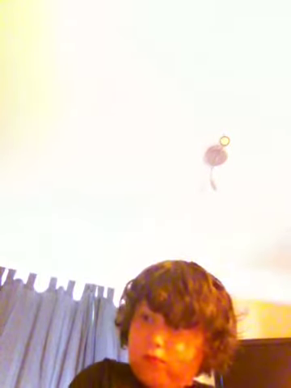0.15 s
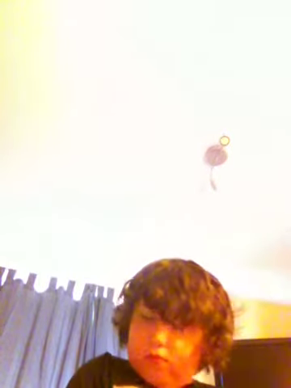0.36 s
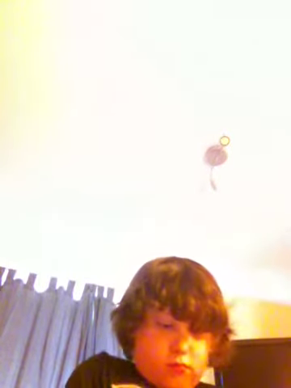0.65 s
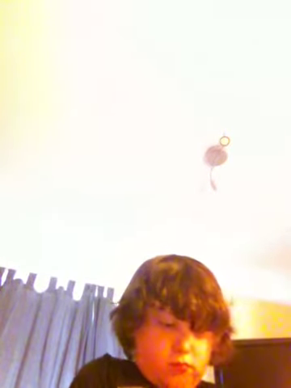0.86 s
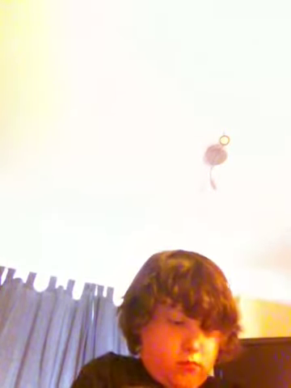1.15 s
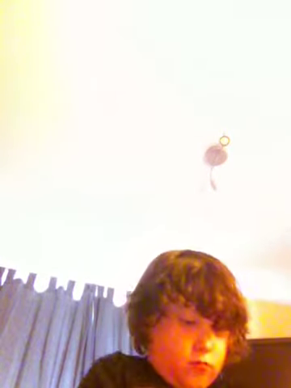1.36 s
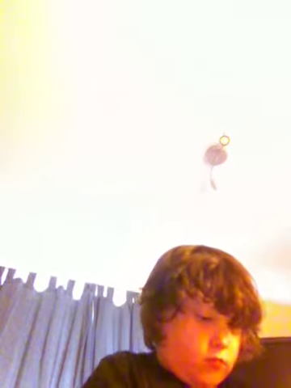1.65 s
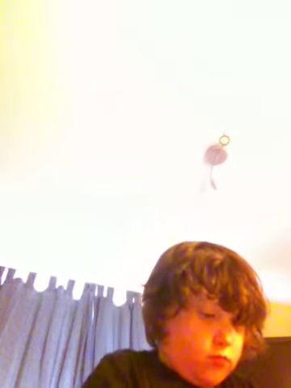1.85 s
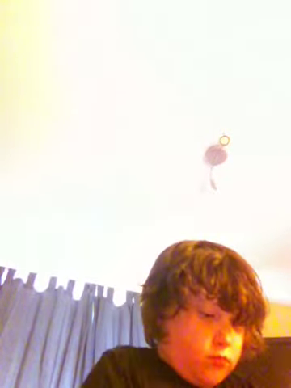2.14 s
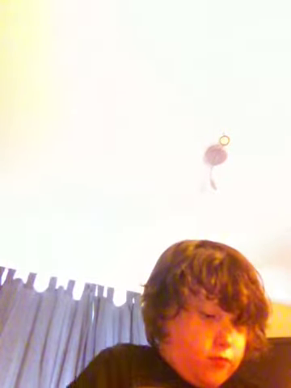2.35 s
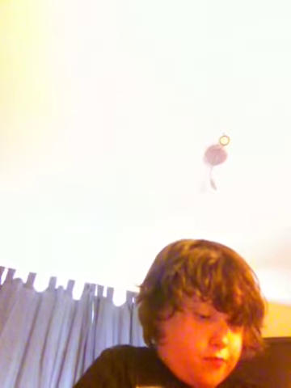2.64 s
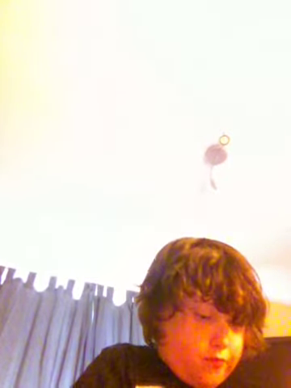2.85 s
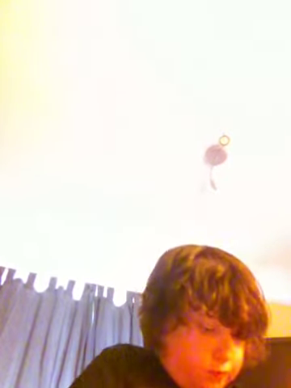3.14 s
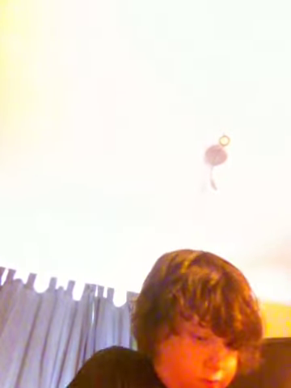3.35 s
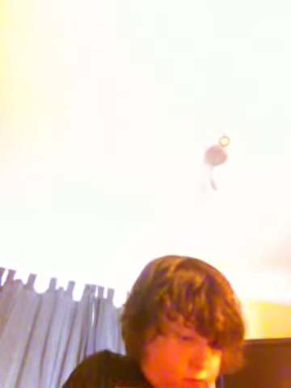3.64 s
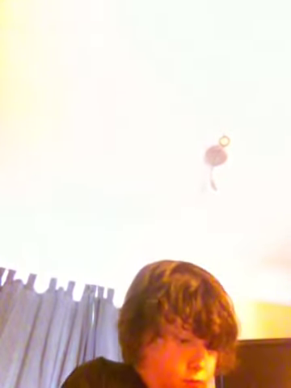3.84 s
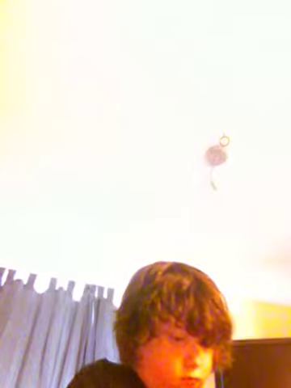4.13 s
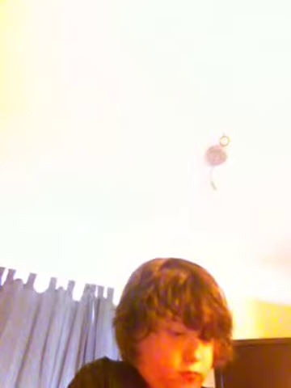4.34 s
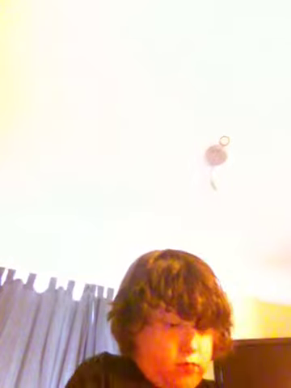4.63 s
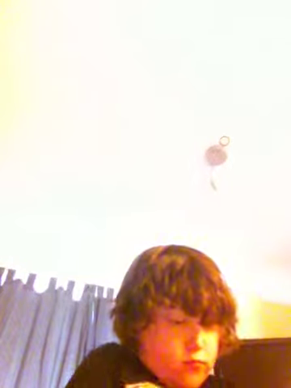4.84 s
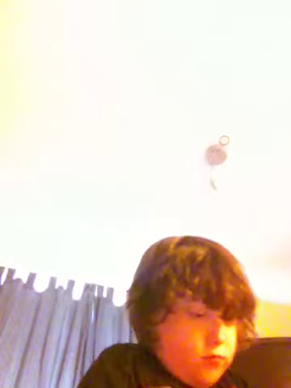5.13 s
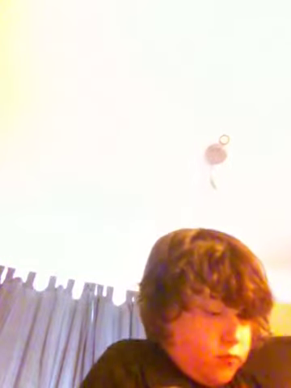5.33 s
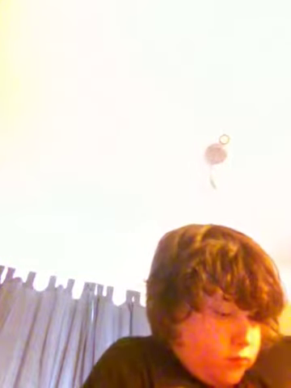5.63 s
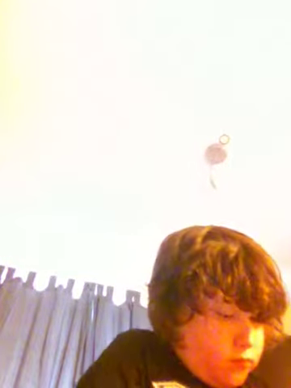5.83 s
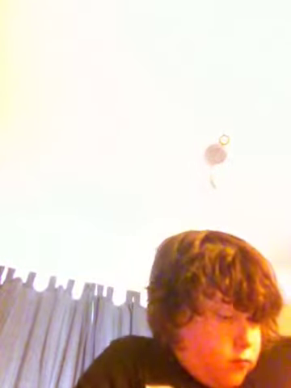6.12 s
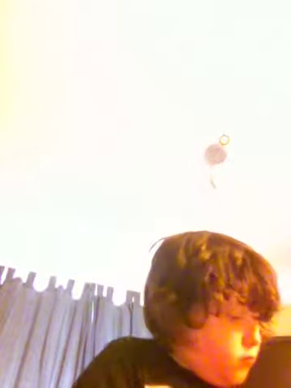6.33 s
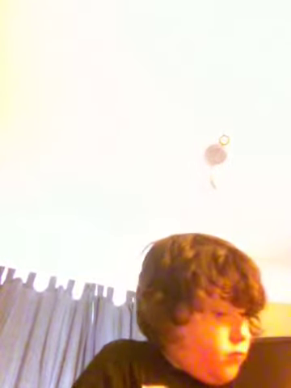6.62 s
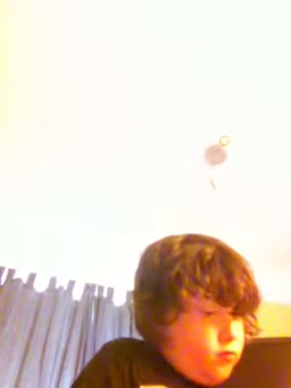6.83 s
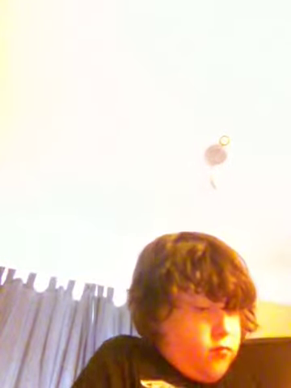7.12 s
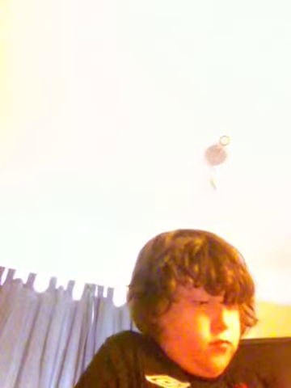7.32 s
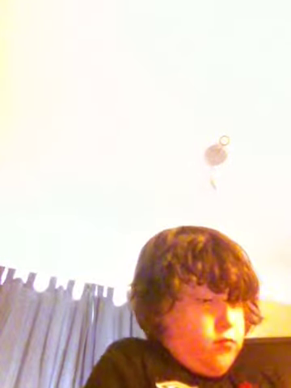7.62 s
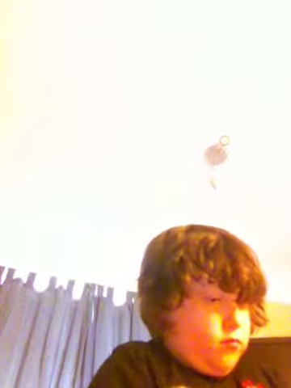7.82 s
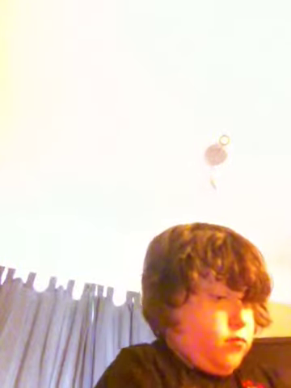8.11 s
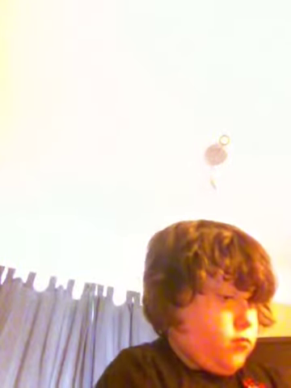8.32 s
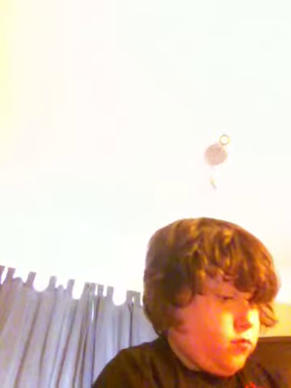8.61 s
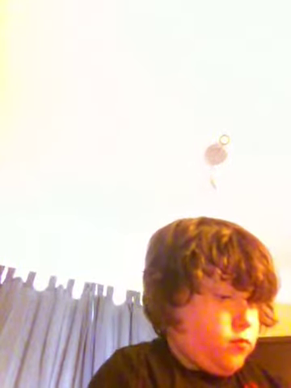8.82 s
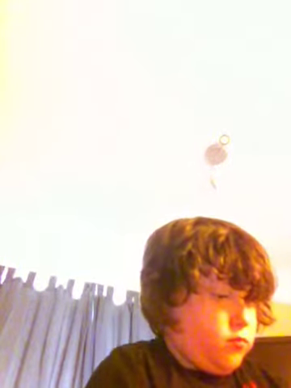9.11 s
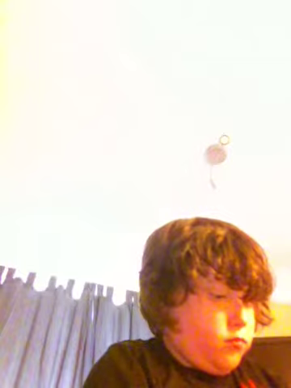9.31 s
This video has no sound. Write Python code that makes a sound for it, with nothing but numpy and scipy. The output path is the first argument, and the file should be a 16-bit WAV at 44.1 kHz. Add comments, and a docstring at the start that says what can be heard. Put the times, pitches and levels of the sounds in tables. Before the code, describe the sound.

Short, raspy rips of adhesive tape pulled off its roll in a quiet small room, with soft rubbing, stick bumps and faint fan hum.

```python
"""A small room: adhesive tape is pulled off its roll in short rips and wound round a stick shaft.
The glue lets go in fast uneven slips that ring the taut strip.
Between pulls the hands rub the tape down and the stick bumps a few times: shudder plus shaft modes.
A fan hums as steady-pitched tones under the shaped noise of air and a small microphone."""
import sys
import numpy as np
from scipy import signal
from scipy.fft import rfft, irfft, next_fast_len
from scipy.io import wavfile
from scipy.ndimage import map_coordinates

SR = 44100
rng = np.random.default_rng(int(sys.argv[2]) if len(sys.argv) > 2 else 0)


def materialize(psi):
    """Save the field psi as 16-bit PCM at rate SR to the path in sys.argv[1].

    A 1-D psi becomes a single channel; in a 2-D psi each row is a channel.
    """
    bounded = np.clip(np.atleast_2d(psi).T, -1, 1)
    quanta = np.round(bounded * 32767).astype(np.int16)
    wavfile.write(sys.argv[1], SR, quanta)


N = 417186
SIZE = 16384  # samples in a click, blow or room tail
HZ = np.fft.rfftfreq(SIZE, 1 / SR)
TIME = np.arange(N) / SR


def amp(db):
    """Amplitude ratio of a level in dB."""
    return 10 ** (np.asarray(db) / 20)


def unit(x):
    """x at rms 1."""
    return x / np.sqrt(np.mean(x ** 2) + 1e-20)


def along(points, hz):
    """Interpolate (frequency [Hz], value) points on a log-frequency axis."""
    point_hz, values = np.transpose(points)
    return np.interp(np.log(hz + 1), np.log(point_hz + 1), values)


def add(track, start_s, sound):
    """Mix a sound into the track from start_s."""
    part = track[max(round(start_s * SR), 0):][:len(sound)]
    part += sound[:len(part)]


def wobble(knots_per_s):
    """Smooth random curve over the whole scene."""
    knots = rng.standard_normal(int(N * knots_per_s / SR) + 4)
    return map_coordinates(knots, [TIME * knots_per_s])


def coloured(x, spectrum):
    """x filtered by (frequency [Hz], level [dB]) points, at rms 1."""
    size = next_fast_len(N + SIZE)
    gain = amp(along(spectrum, np.fft.rfftfreq(size, 1 / SR)))
    return unit(irfft(rfft(x, size) * gain, size)[:N])


def impulse(gain):
    """Causal minimum-phase click of energy 1 with this spectral shape on HZ."""
    cepstrum = irfft(np.log(np.maximum(gain, 1e-6)))
    click = irfft(np.exp(rfft(2 * cepstrum[:SIZE // 2], SIZE)))
    return click / np.linalg.norm(click)


def bent(x, delay_s):
    """Bending waves carry treble faster than bass: delay is delay_s * sqrt(1000 / Hz), less its Nyquist value."""
    phase = 4 * np.pi * delay_s * np.sqrt(1000 * HZ)
    phase = phase - phase[-1] * HZ / SR
    return irfft(rfft(x, SIZE) * np.exp(-1j * phase), SIZE)[:SIZE * 3 // 4]


# room decay: (frequency [Hz], t60 [s])
ROOM_DECAY = [(150, 0.29), (400, 0.23), (1000, 0.2), (2800, 0.19), (7000, 0.2), (15000, 0.22)]


def in_room(x, wet_db, gap_s=0.0033):
    """Direct sound plus a fresh diffuse tail, each frequency dying at its own speed."""
    hz, t, noise = signal.stft(rng.standard_normal(SIZE), SR, nperseg=256)
    decay = amp(-60 * t / along(ROOM_DECAY, hz)[:, None])
    tail = signal.istft(noise * decay, SR, nperseg=256)[1]
    tail[:round(gap_s * SR)] = 0
    response = amp(wet_db) * tail / np.linalg.norm(tail)
    response[0] = 1  # direct sound
    return signal.fftconvolve(x, response / np.linalg.norm(response))


# fan tones: (frequency [Hz], level [dB rms])
FAN_TONES = [(91.5, -89.5), (113.0, -80), (161.5, -81), (253.0, -80.5), (279.9, -80), (301.5, -78.5),
             (344.5, -79.5), (414.5, -84), (441.4, -84)]


def fan(drift_rad=0.24):
    """Rotation gives a set of tones, each with a slow random phase drift."""
    hum = np.zeros(N)
    for hz, db in FAN_TONES:
        phase = 2 * np.pi * (hz * TIME + rng.random()) + drift_rad * wobble(2.56)
        hum += amp(db) * np.sqrt(2) * np.sin(phase)
    return hum


# air and microphone noise: (frequency [Hz], relative density [dB per Hz])
FLOOR_SPECTRUM = [(15, -69), (25, -23), (64, -18.5), (104, -3), (164, -6), (183, -17), (198, -1.5),
                  (322, -9), (349, -3), (389, -8), (421, -13), (537, -11), (648, -12), (1020, -15),
                  (15500, -25)]


def hiss(level_db=-67.5):
    """Air noise and microphone hiss: steady noise, strongest in the lows."""
    return amp(level_db) * coloured(rng.standard_normal(N), FLOOR_SPECTRUM)


# strokes pressing and turning the tape, relative levels:
# (middle time [s], half length to 1/e [s], rub level [dB], dull push level [dB])
RUB_STROKES = [(1.098, 0.012, -73, -55), (1.856, 0.21, -75.5, -71), (2.813, 0.081, -64, -60.5),
               (4.89, 0.037, -68, -66), (5.98, 0.017, -68, -68), (6.557, 0.019, -64.5, -59),
               (6.687, 0.029, -66, -63), (8.346, 0.029, -78, -65)]
# sticky side letting go under a finger: (time [s], relative level [dB])
STICKY_TICKS = [(3.948, -57), (4.857, -52), (5.836, -56)]
# rub on the tape: (frequency [Hz], relative density [dB per Hz])
RUB_SPECTRUM = [(200, -7), (600, 4), (1700, -1.5), (2100, -1), (2450, 0.5), (2800, -5), (5500, -11.5),
                (9000, -32), (16000, -32)]
# push on the shaft: (frequency [Hz], relative density [dB per Hz])
PUSH_SPECTRUM = [(50, -51), (120, -0.5), (220, 4.5), (400, -9), (900, -22), (3000, -72)]


def hands(tick_t60_s=0.043):
    """Fingers smooth the tape: grainy rub noise and sticky ticks over a dull push on the shaft."""
    rub, push = np.zeros(N), np.zeros(N)
    for middle_s, half_s, rub_db, push_db in RUB_STROKES:
        stroke = np.exp(-((TIME - middle_s) / half_s) ** 2)
        rub += amp(rub_db) * stroke
        push += amp(push_db) * stroke
    for start_s, db in STICKY_TICKS:
        add(rub, start_s, amp(db - 60 * TIME[:SIZE] / tick_t60_s))
    grains = rng.standard_normal(N) * amp(2.9 * wobble(500))
    touch = rub * coloured(grains, RUB_SPECTRUM)
    touch += push * coloured(rng.standard_normal(N), PUSH_SPECTRUM)
    return amp(-2) * in_room(touch, wet_db=-3.5)[:N]


# stick bumps: (time [s], relative level [dB], contact low-pass cutoff [Hz], bass boost [dB])
STICK_BUMPS = [(1.954, -47, 470, 10), (3.183, -46.5, 704, -20), (3.195, -52, 654, -14),
               (5.2228, -36, 497, 4.5), (8.667, -29.5, 1540, 0.5)]
# shaft modes: (frequency [Hz], relative level [dB], t60 [s])
SHAFT_MODES = [(109.2, -12.5, 0.15), (138.6, -11, 0.25), (201, -1, 0.13), (260.4, 2.5, 0.09),
               (373, -10, 0.2), (440, -2.5, 0.13), (517, -6.5, 0.14), (595.5, -5, 0.074), (725, 2.5, 0.056),
               (853, -11, 0.13), (913, -18, 0.2), (1110, -30, .1), (1360, -18, 0.082), (1540, -6, 0.058),
               (1720, -6, 0.11), (2145, -18, 0.1), (2350, -12, 0.084), (3750, -15, 0.065)]
# shudder of the bump: (frequency [Hz], relative density [dB per Hz])
THUD_SPECTRUM = [(5, -52), (30, -37), (70, -12), (140, -11.5), (220, -3.5), (340, 2.5), (700, -5),
                 (1400, 0), (2500, -12), (5000, -12.5), (15000, -21)]


def stick(boom_hz=300, ring_db=-3, thud_db=5.0, thud_t60_s=0.032, attack_s=0.00048):
    """A bump is a brief shudder plus the shaft's modes; a soft contact takes the top off both."""
    track = np.zeros(N)
    t = np.arange(SIZE) / SR
    for start_s, db, soft_hz, boom_db in STICK_BUMPS:
        ring = np.zeros(SIZE)
        for k, (hz, mode_db, t60_s) in enumerate(SHAFT_MODES):
            envelope = amp(mode_db + rng.normal(0, 1) - 60 * t / t60_s)
            ring += (-1) ** k * envelope * np.sin(2 * np.pi * hz * t)
        ring *= amp(ring_db) * (1 - np.exp(-t / attack_s))
        shudder = rng.standard_normal(SIZE) * amp(thud_db - 60 * t / thud_t60_s)
        thud = signal.fftconvolve(shudder, impulse(amp(along(THUD_SPECTRUM, HZ))))[:SIZE]
        blow = bent(ring + thud, delay_s=0.00069)
        bass = signal.sosfilt(signal.butter(1, boom_hz, fs=SR, output="sos"), blow)
        blow = blow + (amp(boom_db) - 1) * bass
        blow = signal.sosfilt(signal.butter(2, soft_hz, fs=SR, output="sos"), blow)
        add(track, start_s, amp(db + 2.5) * in_room(blow, wet_db=-7.0))
    return track


def slips(length_s, rate_hz, scatter, size_db, fizz_db, first_db, edge_hz):
    """Stick-slip pulses of rms 1: a first break, then uneven slips; fine glue threads fizz above them."""
    draws = rng.standard_normal((400, 2))
    waits_s = np.exp(scatter * draws[:, 0]) / rate_hz
    times_s = np.cumsum(waits_s) - waits_s[0]
    sizes = amp(size_db * np.tanh(draws[:, 1] / 2) * 2)
    sizes[0] = amp(first_db)
    inside = times_s < length_s
    places = (times_s[inside] * SR).astype(int)
    pulses = unit(np.bincount(places, sizes[inside], int(length_s * SR) + 1))
    threads = rng.standard_normal(len(pulses))
    low = signal.butter(1, edge_hz, "low", fs=SR, output="sos")
    high = signal.butter(1, edge_hz, "high", fs=SR, output="sos")
    return unit(signal.sosfilt(low, pulses) + signal.sosfilt(high, threads) + amp(fizz_db) * threads)


CATCH_PERIOD_S, CATCH_DIP_DB = 0.0236, 14.5


def effort_db(t, swell_db, free_s, hold_s):
    """Level along a pull: a mid-pull swell, and a brief dip at each catch until the tape runs free."""
    stuck = (t < free_s) & ((free_s - t) % CATCH_PERIOD_S < hold_s)
    return swell_db * np.sin(np.pi * t / t[-1]) - CATCH_DIP_DB * stuck


# free-strip resonances, before pitch ratio and common level:
# (frequency [Hz], height at grip 0 [dB], height at grip 1 [dB])
STRIP_MODES = [(493, 16, 13), (725, 11.5, 5), (756, 14.5, 21.5), (953, 18, -4), (1157, -2, 15),
               (1534, 10, 11), (1828, 7.5, 16), (2210, 10, 17), (2456, -15, 6), (2480, 14.5, -25),
               (2990, 4.5, 8), (3490, 2, 4.5), (4170, 7, -7)]


def strip(pitch, grip, honk_hz, honk_db, ring_width_hz=22, ring_damping=0.0034, ring_db=-1,
          honk_octaves=0.19):
    """Gain of the free strip on HZ: narrow resonances, the high ones damped most, under one broad honk."""
    width_hz = ring_width_hz + ring_damping * HZ ** 2 / 1000
    power = 1
    for hz, *heights_db in STRIP_MODES:
        height = amp(np.interp(grip, (0, 1), heights_db) + ring_db)
        power = power + height ** 2 / (1 + ((HZ - hz * pitch) / width_hz) ** 2)
    octaves_off = np.log2((HZ + 1) / honk_hz)
    return np.sqrt(power) * amp(honk_db * np.exp(-(octaves_off / honk_octaves) ** 2))


# pulls of tape: (time [s], length [s], level [dB], mid-pull swell [dB], bass [dB], treble [dB],
# runs free after [s], hold of a catch [s], strip pitch [ratio], grip [0-1], honk [Hz], honk [dB])
TAPE_PULLS = [(0.0, 0.012, -52, 0, 8.5, 7, 0, 0, 1.0, 0.6, 2000, 2.5),
              (0.357, 0.064, -51, 8, 5, 1.5, 0.02, 0.013, 1.03, 0, 486, 7.5),
              (0.714, 0.065, -38, -1, -5, 5, 0.5, 0.00081, 0.96, 0.03, 497, 8),
              (2.585, 0.028, -39.5, 2, 4.5, 3.5, 0.022, 0.00053, 0.96, 0.25, 3040, 8.5),
              (3.247, 0.11, -37.5, -0.9, 3.5, 3.5, 0.091, 0.0093, 1.04, 1, 2460, -0.5),
              (3.442, 0.106, -39, 2, 2.5, 5, 0.023, 0.0097, 1.0, 1, 1260, 2),
              (5.026, 0.11, -38, 2.5, -5, -0.5, 0.019, 0.005, 1.0, 0.1, 2450, 1.5),
              (6.809, 0.13, -40.5, 6, -1, 3, 0.021, 0.0055, 1, 1, 2230, 5.5),
              (7.357, 0.098, -38.5, -0.8, -7, -1, 0.021, 0.0044, 1.014, 0.75, 480, 10.5),
              (7.901, 0.011, -38, 2, 0, -0.5, 1, 0.0014, 0.96, 0.27, 2050, 1),
              (7.982, 0.056, -38.5, -0.5, -2, 0.5, 0.0049, 0, 0.99, 0.2, 2220, 1.5)]
# one glue slip: (frequency [Hz], relative density [dB per Hz])
SLIP_SPECTRUM = [(5, -45), (30, -27), (70, -15.5), (130, 2), (230, 8.5), (380, -2), (750, -5), (1300, -1),
                 (2450, -0.5), (2750, -1.5), (4700, -1), (7000, -9), (9000, -15), (16000, -23.5)]
# gained once free
RUN_UP_S, BASS_RISE_DB, TREBLE_RISE_DB = 0.051, 3.5, 6.5


def tape(bass_hz=500, treble_hz=6000):
    """Slips ring the taut strip; each pull grows fuller and brighter once it runs free."""
    track = np.zeros(N)
    bass_shelf = 1 / (1 + (HZ / bass_hz) ** 4)
    treble_shelf = 1 / (1 + (treble_hz / (HZ + 1)) ** 4)
    for start_s, length_s, db, swell_db, bass_db, treble_db, free_s, hold_s, *tuning in TAPE_PULLS:
        peel = slips(length_s, rate_hz=640, scatter=.55, size_db=3.5, fizz_db=-23.5,
                     first_db=1.5, edge_hz=6200)
        t = TIME[:len(peel)]
        peel = peel * amp(db + effort_db(t, swell_db, free_s, hold_s))
        speed = np.clip((t - free_s) / RUN_UP_S, 0, 1)
        body = strip(*tuning)
        rip = 0
        for share, fast in ((1 - speed, 0), (speed, 1)):  # slow colour fades into fast
            low_db = (bass_db + fast * BASS_RISE_DB) * bass_shelf
            high_db = (treble_db + fast * TREBLE_RISE_DB) * treble_shelf
            gain = amp(along(SLIP_SPECTRUM, HZ) + low_db + high_db) * body
            snap = bent(impulse(gain), delay_s=0.000335)
            rip = rip + signal.fftconvolve(peel * share, snap)
        add(track, start_s, in_room(rip, wet_db=-5.5))
    return track


def scene():
    """Everything at one microphone."""
    return (fan() + hiss() + hands() + stick() + tape())[None]


def record(dry, top_hz=15850):
    """The recorder keeps nothing at or above its band limit."""
    size = next_fast_len(N + SIZE)
    passed = np.fft.rfftfreq(size, 1 / SR) < top_hz
    return irfft(rfft(dry, size) * passed, size)[:, :N]


dry = scene()
out = record(dry)
materialize(out)
```